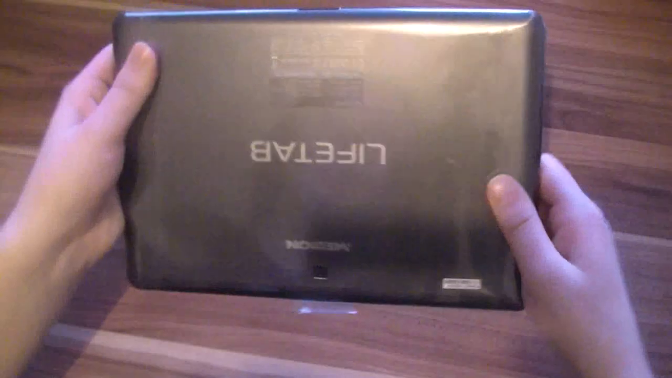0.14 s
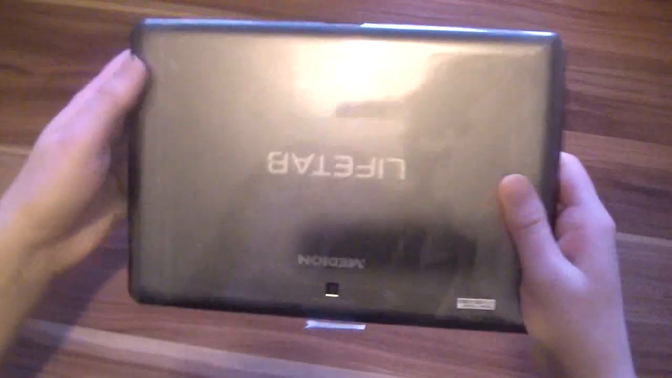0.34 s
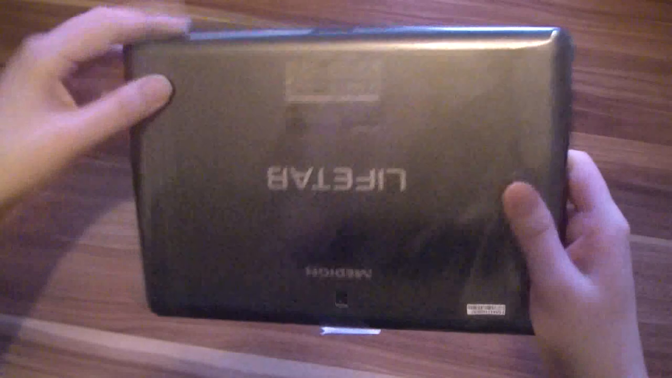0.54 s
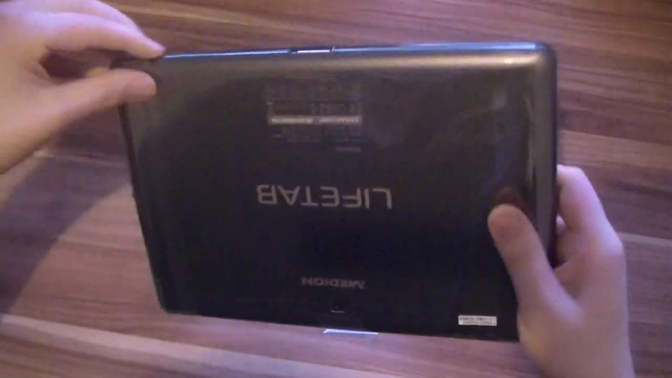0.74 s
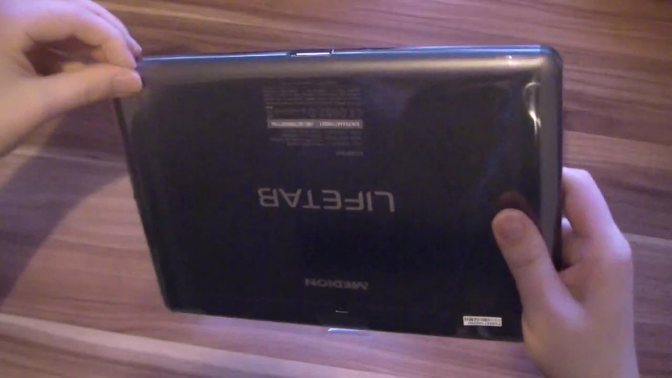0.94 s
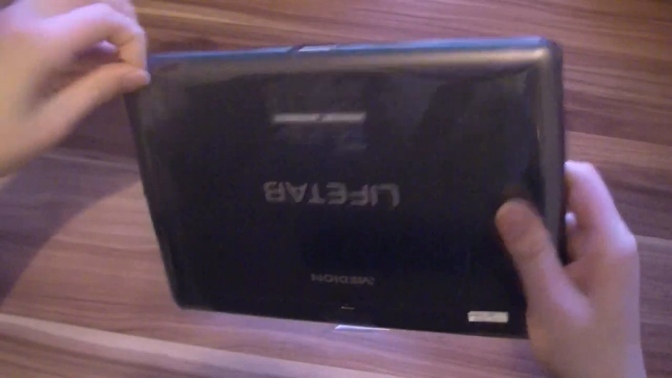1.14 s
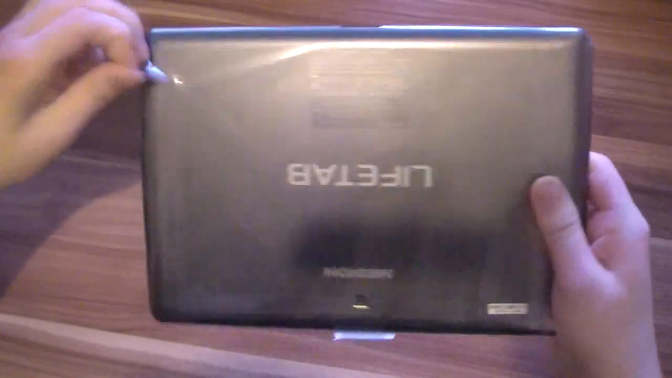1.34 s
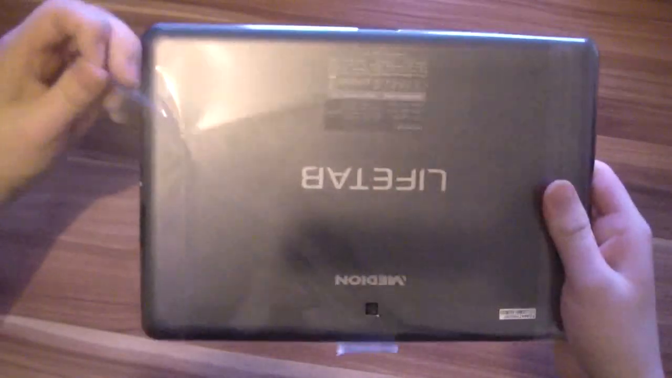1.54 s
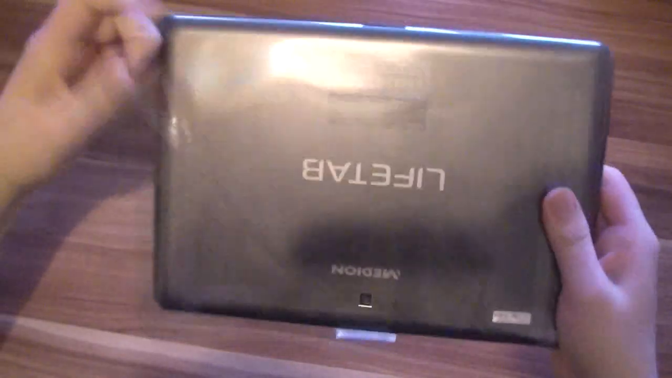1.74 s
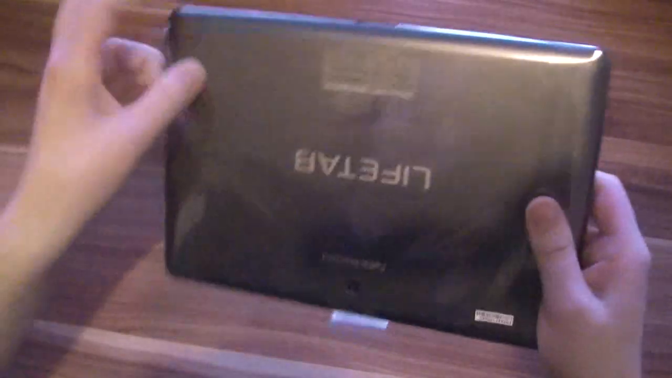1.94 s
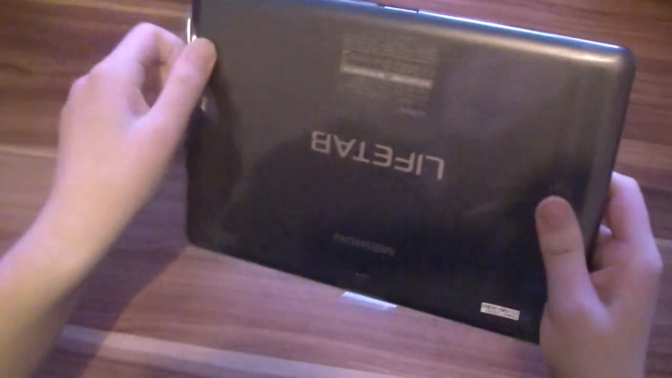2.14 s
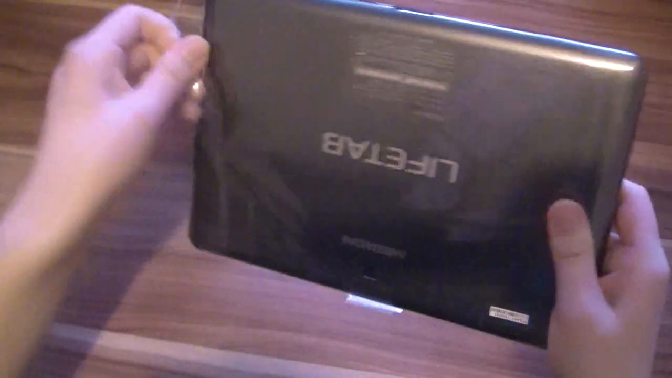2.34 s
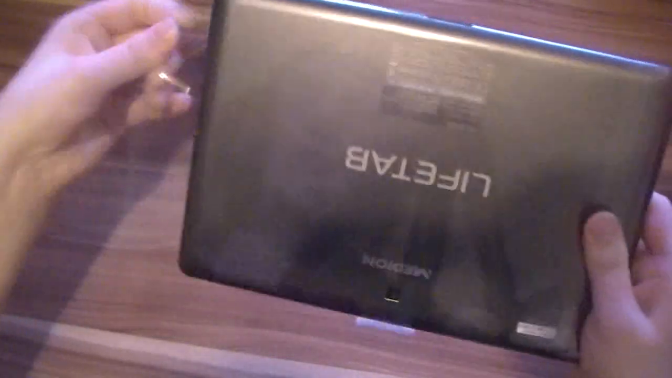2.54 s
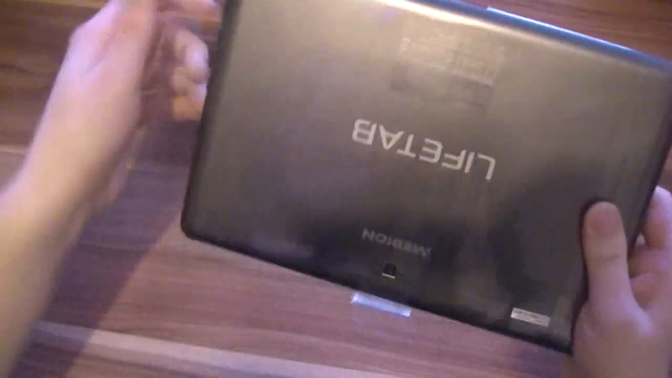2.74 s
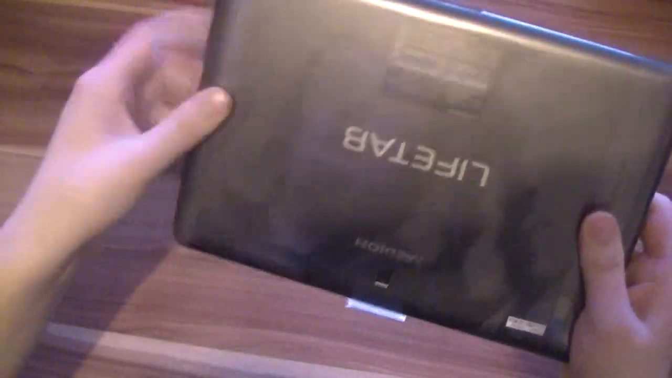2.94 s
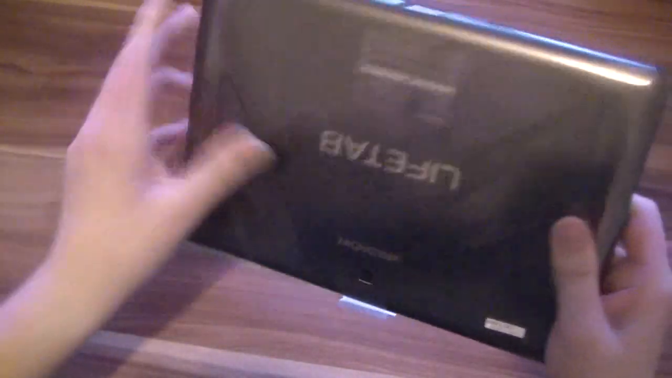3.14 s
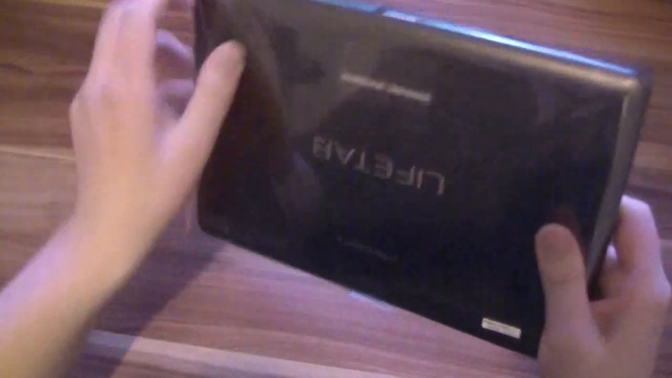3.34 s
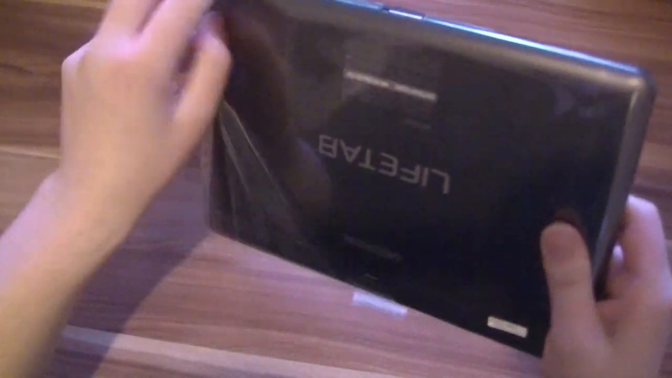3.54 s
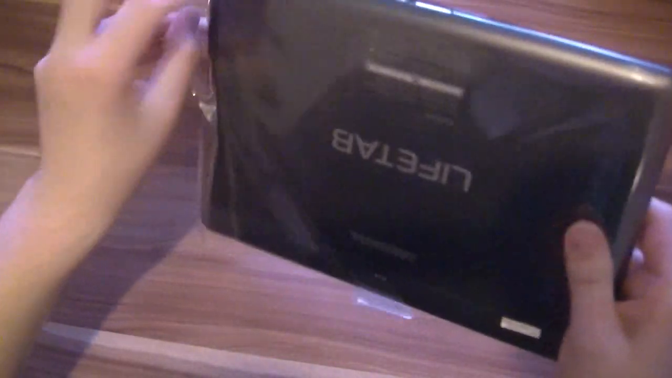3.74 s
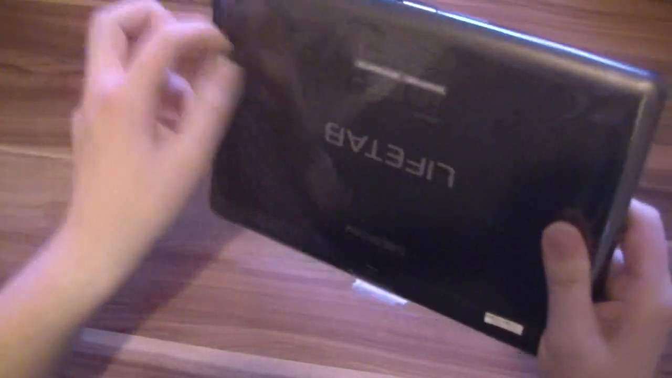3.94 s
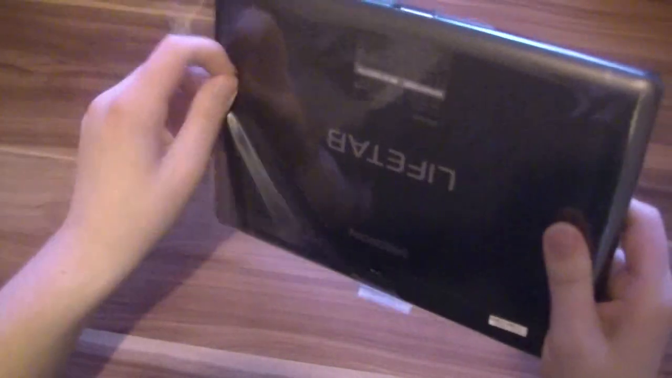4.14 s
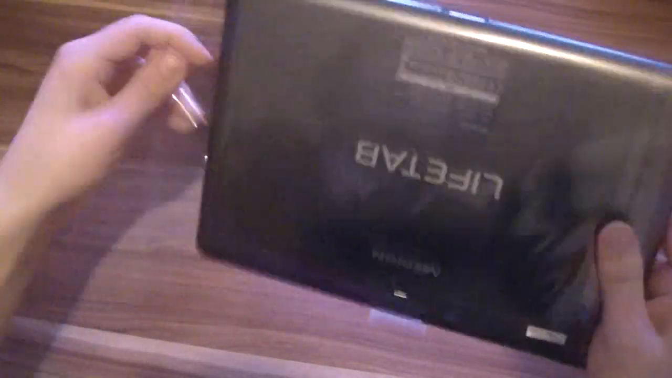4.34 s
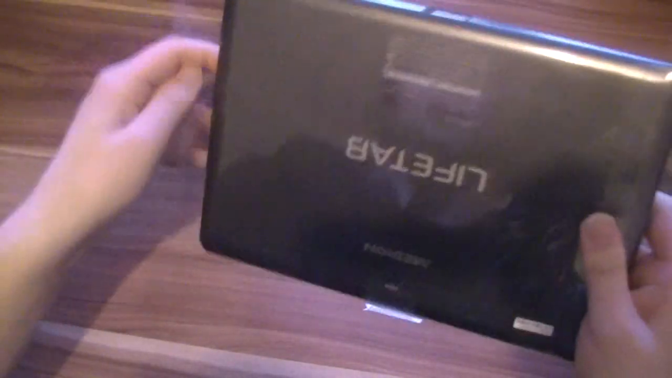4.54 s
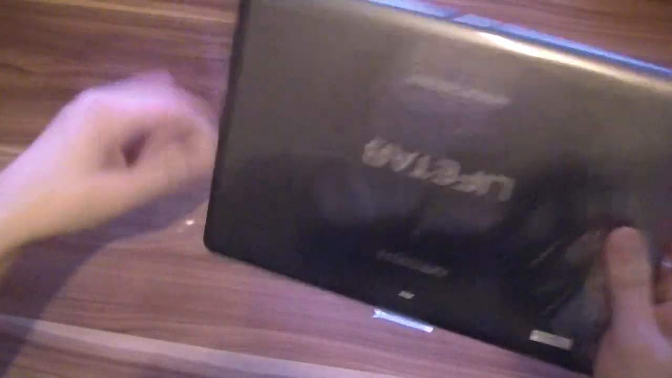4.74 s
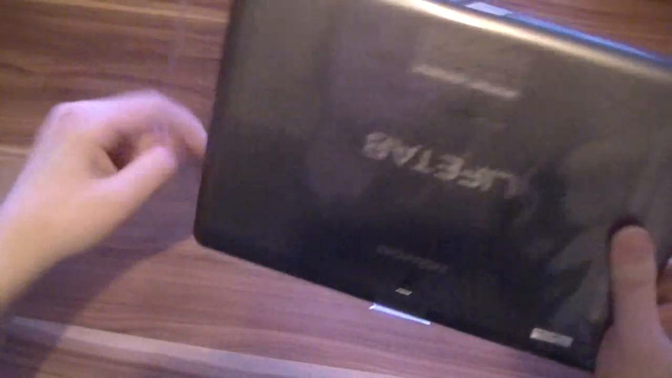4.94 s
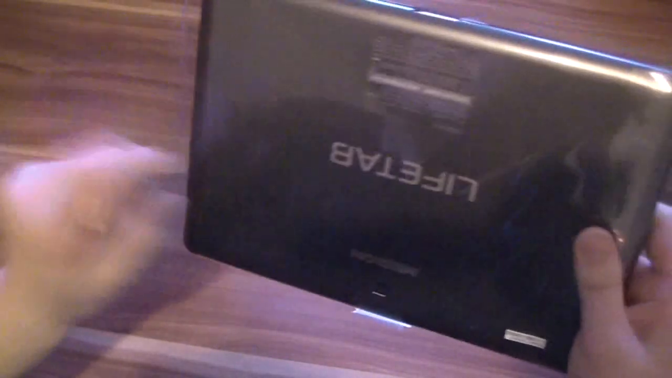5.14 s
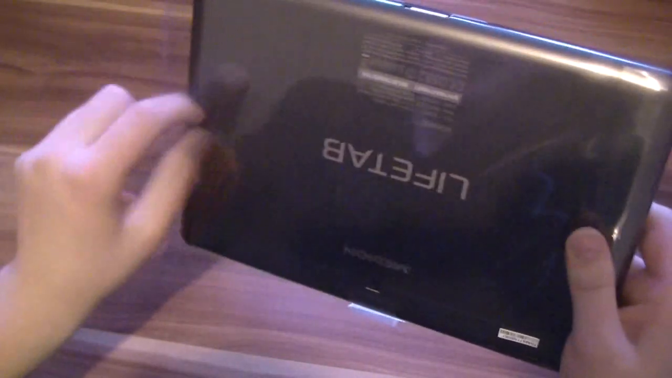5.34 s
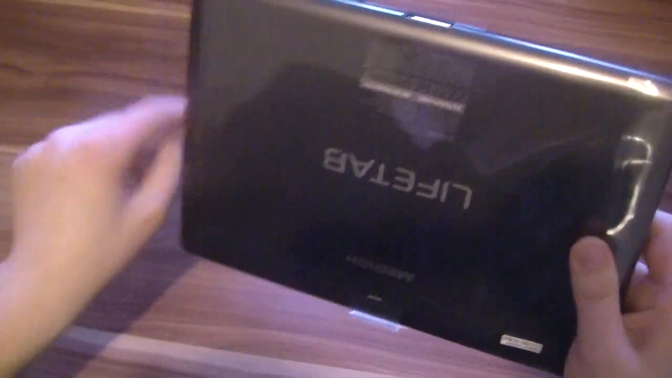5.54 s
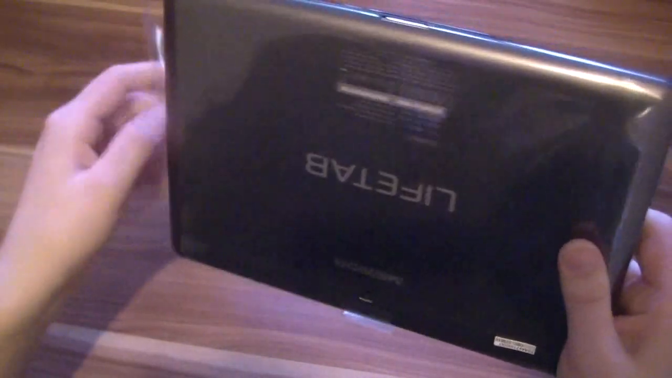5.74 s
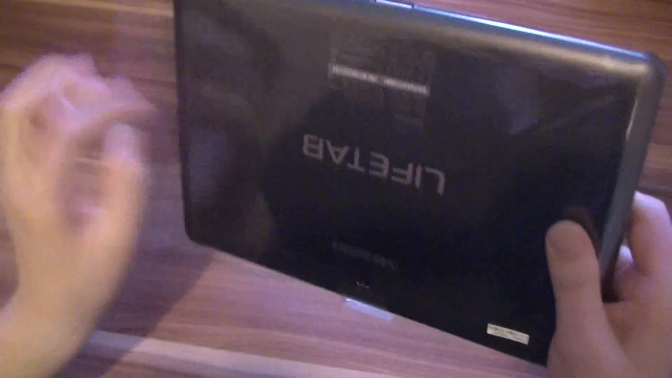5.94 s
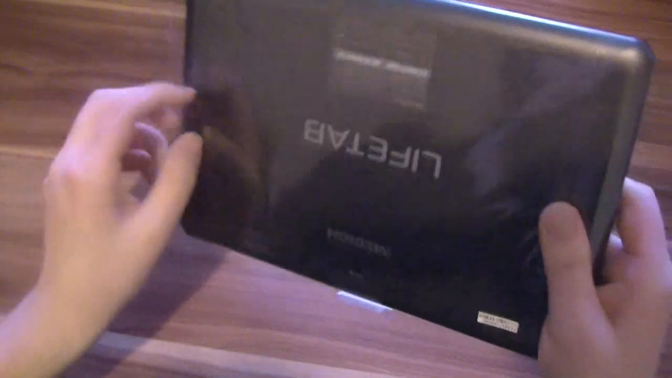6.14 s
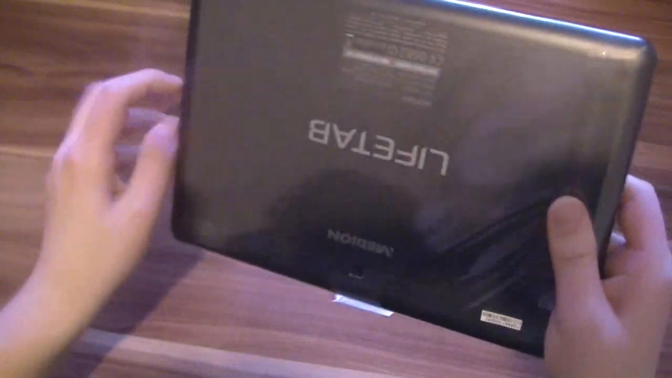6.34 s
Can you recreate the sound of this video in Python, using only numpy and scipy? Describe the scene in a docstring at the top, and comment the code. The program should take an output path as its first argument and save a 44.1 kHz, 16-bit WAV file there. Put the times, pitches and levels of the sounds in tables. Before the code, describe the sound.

Close stereo microphone in a small quiet room. Skin rubs faintly on a plastic shell, then soft ticks of thin film being picked. From about a second and a half the creases snap brighter, bursting into very loud sharp cracks near 2.5 and 4.25 seconds, with light hollow knocks and a short echo. Uneven medium crackles continue to the end.

```python
"""Peeling a protective film

Fingers pick a thin film off the plastic back of a hand-held tablet, close to a stereo microphone.
Creases buckle with bright snaps of filtered noise and knock the hollow shell, a set of decaying modes.
Random grains make the film's ticks, the fine hiss of glue letting go and the rub of skin on the shell.
One strong echo and a short room tail follow every snap, over a quiet hum of room air."""
import sys
import numpy as np
from scipy import signal
from scipy.fft import rfft, irfft
from scipy.io import wavfile

SR = 44100
rng = np.random.default_rng(int(sys.argv[2]) if len(sys.argv) > 2 else 0)


def to_linear_factor(level_db):
    """Convert decibel levels (scalar or array-like) to linear amplitude factors."""
    exponent = np.asarray(level_db, float) / 20
    return 10 ** exponent


def persist_wave(psi):
    """Save psi, clipped to +-1, as 16-bit WAV."""
    counts = np.round(np.clip(psi, -1, 1) * 32767).astype(np.int16)
    wavfile.write(sys.argv[1], SR, np.atleast_2d(counts).T)


N = 281910

# Single buckling creases. Each row: start in seconds, snap level in dB, middle pitch of the snap in Hz,
# level in dB of the knock on the shell's upper modes, level in dB of the thud on its lower modes.
SINGLE_SNAPS = [(0.3251, -34.5, 7300, -51, -69), (0.432, -61, 5000, -54.5, -49.5),
                (0.4964, -56, 3420, -50, -66), (0.589, -42, 7350, -53, -53), (0.6, -33, 11200, -63, -47),
                (0.7456, -43, 5700, -44.5, -55), (1.2554, -44, 8600, -60, -46.5),
                (1.289, -39.5, 9000, -66, -71), (1.3846, -16.5, 7300, -38, -72),
                (1.402, -30.5, 6900, -41, -68), (1.408, -18.5, 7000, -40, -69),
                (1.554, -32.5, 6570, -54, -67), (1.6852, -37, 5600, -40, -66),
                (1.708, -24.5, 9100, -65, -43), (1.7246, -26.5, 5900, -31, -38),
                (1.8996, -42, 6800, -38, -36.5), (1.9144, -20, 8200, -30, -37),
                (1.929, -27, 3660, -27, -33.5), (1.9387, -14, 8000, -22.5, -33),
                (1.9949, -43, 6500, -40, -38.5), (2.023, -47, 4200, -35.5, -41),
                (2.069, -19.5, 8040, -34, -44), (2.0932, -54, 6040, -35, -36.5),
                (2.187, -30, 5700, -38, -63), (2.3426, -20, 4500, -32.5, -63),
                (2.454, -5.5, 6530, -14.5, -32), (2.486, 2, 7800, -14, -23.5), (2.495, 0, 6160, -16, -30.5),
                (2.545, -10, 8300, -34, -35), (2.648, -17.5, 6430, -40, -38),
                (2.6651, -21.5, 7200, -51, -34), (2.6911, -16.5, 5250, -22.5, -25.5),
                (2.7457, -29, 6300, -26.5, -50), (2.7593, -0.5, 7300, -21, -38),
                (2.9478, -38, 4260, -37, -31), (2.9856, -22.5, 5440, -30.5, -40),
                (3.018, -14, 5140, -37, -45), (3.243, -20, 4400, -38, -43), (3.32, -26.5, 5800, -36.5, -44),
                (3.49, -24, 6800, -32.5, -38.5), (3.51, -32, 5400, -35.5, -41),
                (3.5384, -30, 10500, -54, -54), (3.5707, -7.5, 8200, -18.5, -26.5),
                (3.596, -17, 4870, -22.5, -27.5), (3.6595, -18, 6470, -23, -42),
                (3.744, -6.5, 7600, -22.5, -39), (3.912, -8.5, 7300, -22, -31.5),
                (3.9524, -12, 9100, -25, -28), (3.9774, -14, 9000, -28, -38),
                (4.046, -30, 4460, -39.5, -39), (4.1218, -24.5, 5240, -29.5, -38.5),
                (4.1867, -14.5, 6000, -21.5, -29.5), (4.233, -22, 5300, -31, -59),
                (4.2547, 1, 5750, -13.5, -51), (4.2782, 0, 8600, -14, -37),
                (4.296, -20, 7100, -10.5, -20.5), (4.3107, -19.5, 5000, -18, -34),
                (4.3458, -14, 5600, -39, -30), (4.415, -27, 5640, -25.5, -31.5),
                (4.5032, -49, 3200, -40, -32.5), (4.513, -12, 5000, -19, -34), (4.568, -31, 3940, -33, -38),
                (4.5949, -18, 4800, -34.5, -38.5), (4.6017, -12.5, 7200, -53, -34.5),
                (4.6163, -18.5, 6800, -24.5, -30), (4.6359, -14.5, 5130, -35, -31),
                (4.7225, -25, 7000, -35, -30.5), (4.7483, -13.5, 7500, -20.5, -26.5),
                (4.7917, -27, 6230, -30, -26), (4.9902, -24.5, 6900, -33.5, -34),
                (5.0617, -22.5, 7400, -28, -32.5), (5.2407, -32, 5500, -37, -46),
                (5.3148, -31, 5000, -33.5, -39), (5.5085, -27, 7300, -34.5, -30.5),
                (5.534, -33, 3630, -29, -29), (5.589, -18.5, 7400, -22.5, -27.5),
                (5.609, -23.5, 8700, -53, -30), (5.6974, -13.5, 6060, -30, -37.5),
                (5.7954, -18.5, 5030, -30, -63), (5.8695, -13, 8900, -22, -31.5),
                (5.9345, -26.5, 7000, -38, -36), (5.9838, -16, 7200, -29.5, -31.5),
                (6.0867, -27.5, 4430, -27.5, -30), (6.1087, -29, 6700, -46, -54),
                (6.2184, -26.5, 4450, -38.5, -59), (6.292, -28.5, 5000, -37, -55),
                (6.3092, -34, 3800, -41, -41), (6.3374, -25, 5200, -24, -32.5),
                (6.364, -34, 4500, -38, -25)]


def snaps():
    """Buckling: a crease gives way in a crack, flutters as it settles, and strikes the shell.
    Returns the sound towards the microphone and the smoother mean over all directions, for the room."""
    # Shell modes. Each row: nominal frequency in Hz, relative level in dB, t60 in seconds.
    low_modes = [(308, -3, 0.016), (484, 5, 0.012), (515, 4.5, 0.011), (730, 4, 0.019), (975, 2.5, 0.027),
                 (1170, -2, 0.018)]
    high_modes = [(1500, -3.5, 0.028), (1960, 6.5, 0.0096), (2430, -1, 0.022), (2725, -0.5, 0.014),
                  (3530, 4.2, 0.011)]
    s, snap_db, pitch_hz, knock_db, thud_db = np.transpose(every_snap())
    count = len(s)
    t = np.arange(1200) / SR
    click = 1.0 * (t == 0)

    shape = np.exp(-t / 0.00025) + to_linear_factor(-15) * np.exp(-t / 0.0022)
    # after 0.6 ms the flutter is made of small re-snaps
    flutter_db = 4 * np.minimum(rng.exponential(1, (count, len(t))), 3) - 4
    cracks = rng.standard_normal((count, len(t))) * shape * to_linear_factor(flutter_db * (t > 0.0006))
    spread = np.zeros_like(cracks)
    for k, hz in enumerate(pitch_hz):
        # the buckling patch sets the colour; a small crease radiates no bass
        both = [cracks[k], click]
        patch = band(both, hz / 1.58, hz * 1.496, order=2)
        cracks[k], spread[k] = patch + 0.041 * band(both, 4700, 10700)

    towards = to_linear_factor(snap_db)[:, None] * peak_one(cracks)
    knocks = shell(high_modes, t, count, spread_db=5.0, contact_s=0.0001)
    towards += to_linear_factor(knock_db)[:, None] * knocks
    thuds = shell(low_modes, t, count, spread_db=4.0, contact_s=0.00048)
    towards += to_linear_factor(thud_db)[:, None] * thuds

    around = to_linear_factor(snap_db + 5)[:, None] * peak_one(spread)
    around += to_linear_factor(knock_db + 8)[:, None] * peak_one(band([click], 1340, 3860, order=2))
    around += to_linear_factor(thud_db + 8.5)[:, None] * peak_one(band([click], 335, 1430, order=2))

    # a faint noise swells for a few milliseconds before each snap
    lead = 200  # samples
    swell = np.exp(np.arange(-lead, 0) / (0.0015 * SR))
    noise = band(rng.standard_normal((count, lead)), 1500, 12000) * swell
    lead_in = lay_out(s - lead / SR, to_linear_factor(snap_db - 15)[:, None] * peak_one(noise))

    # each crease sits a little to one side
    lean_db = 0.4 * rng.standard_normal((count, 1))
    left = lay_out(s, towards * to_linear_factor(lean_db))
    right = lay_out(s, towards * to_linear_factor(-lean_db))
    return np.array([left, right]) + lead_in, lay_out(s, around)


def every_snap():
    """Cascaded buckling: single snaps, then the uneven run of snaps as each fold rips open."""
    # Each row: start in seconds, length in seconds, typical snap level in dB, middle pitch in Hz.
    rips = [(1.887, .012, -40, 5600), (3.927, .02, -35, 5950), (2.497, .03, -49.5, 6800),
            (4.163, .02, -33, 5000), (4.241, .01, -24.5, 6200), (4.265, .038, -16, 5740),
            (4.748, .022, -23.5, 5400), (4.831, .026, -27.5, 5000), (4.975, .012, -30.5, 6500),
            (5.045, .022, -29.5, 6600), (5.576, .012, -30, 4400), (5.852, .018, -29.5, 6200),
            (5.493, .016, -35.5, 5800), (6.335, .016, -31.5, 4860)]
    gap_s = 0.004
    rows = [np.array(SINGLE_SNAPS)]
    for start, length, db, hz in rips:
        count = max(2, round(length / gap_s))
        luck = rng.standard_normal((12, 5))[:count]
        s = start + gap_s * (np.arange(len(luck)) + 0.3 * np.clip(luck[:, 0], -1, 1) + 0.3)
        pitch_hz = hz * 2 ** (0.3 * luck[:, 1])  # spread in octaves
        snap_db, knock_db, thud_db = np.transpose(db + 3.0 * luck[:, 2:])
        rows.append(np.transpose([s, snap_db, pitch_hz, knock_db - 8.5, thud_db - 15.5]))
    return np.vstack(rows)


def shell(modes, t, count, spread_db, contact_s):
    """Modal ringing: each blow lands elsewhere, so every mode varies in strength, sign and tuning."""
    hz, db, t60 = np.transpose(modes)
    luck = rng.standard_normal((count, 3, len(hz), 1))
    strength = to_linear_factor(db[:, None] + spread_db * luck[:, 0]) * np.sign(luck[:, 1])
    tuned_hz = hz[:, None] * (1 + 0.05 * luck[:, 2])
    rings = np.sin(2 * np.pi * tuned_hz * t) * to_linear_factor(-60 * t / t60[:, None])
    contact = 1 - np.exp(-t / contact_s)
    return peak_one((strength * rings).sum(axis=1) * contact)


def crinkle():
    """Crackling noise: small creases tick in clumps, each tick an octave or so wide at its own pitch."""
    # Fingers working the loose film. Each row: time in seconds, relative level in dB,
    # middle pitch of the ticks in Hz.
    handling = [(0, -74, 3170), (.6, -73, 4000), (1.0, -85, 5000), (1.4, -64, 1500), (1.82, -70, 2010),
                (2.15, -51.5, 2500), (2.3, -63.5, 3070), (2.65, -41.5, 2500), (3.0, -77, 2000),
                (3.3, -55.5, 3000), (3.46, -79.5, 3000), (3.9, -69, 2500), (4.5, -68, 1500),
                (4.85, -44, 1500), (5.2, -86, 2500), (5.3, -52.5, 2500), (5.47, -65.5, 1990),
                (5.8, -45, 2500), (6.15, -61.5, 1810), (6.39, -52.5, 1200)]
    level_db, pitch_hz = in_time(handling)

    # after a knock the shaken film keeps crinkling for a moment; this is added as power
    s, knock_db = np.transpose(SINGLE_SNAPS)[[0, 3]]
    t = np.arange(SR // 2) / SR
    swell = (1 - np.exp(-t / 0.0062)) * np.exp(-t / 0.034)
    shaken = lay_out(s, to_linear_factor(2 * (knock_db - 25))[:, None] * swell)

    clumps = to_linear_factor(3.8 * drift(35))
    out = 0
    for hz in np.geomspace(400, 12000, 10):
        releases = grains(per_s=170.0 * clumps, size_db=3.5) + 1e-18
        tick = rms_one(band(releases, hz / 1.53, hz * 1.86, order=2))
        out = out + closeness(hz, pitch_hz, octaves=1.72) * tick
    return out * np.sqrt(to_linear_factor(2 * level_db) + shaken) / 2


def peel():
    """Adhesive fracture: glue threads break by the thousand as each pull settles to its own pitch."""
    # Each row: start in seconds, length in seconds, relative hiss level in dB,
    # first pitch in Hz, settled pitch in Hz.
    pulls = [(.03, 0.24, -65, 7100, 7300), (1.26, 0.392, -58, 8340, 6300), (2.26, 0.077, -54, 9000, 5600)]
    width_octaves, settle_s = 0.18, 0.098
    upper_ratio, upper_share = 1.47, 0.54  # a second, weaker band above the first
    gain = np.zeros(N)
    pitch_hz = np.full(N, pulls[0][3], float)
    for start, length, db, first_hz, settled_hz in pulls:
        t, shape = stroke(start, length, attack=0.02, release=0.03)
        gain = gain + to_linear_factor(db) * shape
        glide_hz = settled_hz + (first_hz - settled_hz) * np.exp(-t / settle_s)
        pitch_hz = np.where(t > 0, glide_hz, pitch_hz)
    out = 0
    for hz in np.geomspace(4800, 15500, 13):
        threads = band(grains(per_s=4000.0, size_db=2.5), hz / 1.09, hz * 1.09, order=2)
        main = closeness(hz, pitch_hz, width_octaves)
        upper = closeness(hz, upper_ratio * pitch_hz, width_octaves)
        out = out + (main + upper_share * upper + 0.25) * rms_one(threads)
    return out * gain * to_linear_factor(2.5 * drift(25)) / 2


def slide():
    """Stick-slip friction: skin slips in dense grains and excites the hollow of the shell."""
    # Each row: frequency in Hz, relative spectrum level in dB.
    rub_spectrum = [(200, -25), (400, 0), (560, 5), (720, 1), (950, 8.5), (1300, -7), (2200, -14.5),
                    (3200, -10.5), (4500, -14), (9000, -32)]
    t, shape = stroke(start=0.016, length=0.26, attack=0.052, release=0.035)
    rub = coloured(grains(per_s=3200.0, size_db=1.0), rub_spectrum)
    fading_db = -48 - 36 * t  # fades by 36 dB per second
    return rub * shape * to_linear_factor(fading_db + 2.0 * drift(21))


def hand():
    """Superposition of everything between the loud snaps."""
    return peel() + slide() + crinkle()


def room(x):
    """Diffuse reverberation: a noise tail fills in, then decays exponentially band by band."""
    # Each row: frequency in Hz, t60 in seconds, relative level in dB, left-right likeness.
    decay = [(149, 0.35, -27, 0.28), (397, 0.43, -37.5, 0.97), (990, 0.37, -39, 0.53),
             (2500, 0.36, -35, 0.51), (5000, 0.42, -34, 0.25), (9000, 0.32, -34.5, 0.071),
             (12050, 0.31, -34.5, .2), (15500, 0.22, -30, 0.19)]
    fill_s = 0.0013
    t = np.arange(SR // 2) / SR
    edges = 100 * 2 ** np.arange(0, 7.6, 0.5)  # half octaves, in Hz
    tail = 0
    for low, high in zip(edges, edges[1:]):
        mid, side = band(rng.standard_normal((2, len(t))), low, high, order=2)
        hz = np.sqrt(low * high)
        level_db = at_hz(decay, hz, order=2) - 60 * t / at_hz(decay, hz)
        tail = tail + pair(mid, side, at_hz(decay, hz, order=3)) * to_linear_factor(level_db)
    tail = tail * np.minimum(t / fill_s, 1)
    return signal.fftconvolve(x[None], tail)[:, :N]


def air():
    """Stationary noise: room air and microphone hiss, mostly unlike in the two channels."""
    # Each row: frequency in Hz, relative spectrum level in dB.
    spectrum = [(18, -53), (30, -16.5), (154, -5), (409, -11.5), (858, -11.5), (1090, -14), (5440, -29),
                (14800, -32), (15900, -67)]
    # Each row: frequency in Hz, left-right likeness.
    likeness = [(60, 0.25), (130, 0.51), (300, 0.032), (1500, 0.12), (6000, .15), (15000, .1)]
    mid, side = rfft(coloured(rng.standard_normal((2, N)), spectrum))
    hz = np.arange(len(mid)) * SR / N
    both = irfft(pair(mid, side, at_hz(likeness, hz)), N)
    return to_linear_factor(-63.5 + 0.16 * drift(8)) * np.sqrt(2) * both


def grains(per_s, size_db):
    """Poisson-like impulses: tiny releases at random moments, most small, a few large."""
    sizes = to_linear_factor(size_db * np.minimum(rng.exponential(1, N), 5)) * rng.choice([-1, 1], N)
    return sizes * (rng.random(N) < per_s / SR)


def stroke(start, length, attack, release):
    """Amplitude envelope: time since the start, and a gain that rises, holds and lets go."""
    t = np.arange(N) / SR - start
    ramps = np.minimum(t / attack, (length + release - t) / release)
    return np.maximum(t, 0), np.clip(ramps, 0, 1) ** 2


def drift(rate):
    """Low-passed noise: a slow random wander of rms 1, with its corner at rate in Hz."""
    r = np.exp(-2 * np.pi * rate / SR)
    noise = rng.standard_normal(N + SR)
    # the first second lets the filter settle
    return rms_one(signal.lfilter([1], [1, -2 * r, r * r], noise)[SR:])


def coloured(x, spectrum):
    """Spectral shaping: weight a long noise in frequency; rms 1."""
    n = x.shape[-1]
    gain = to_linear_factor(at_hz(spectrum, np.arange(n // 2 + 1) * SR / n))
    return rms_one(irfft(rfft(x) * gain, n))


def pair(mid, side, likeness):
    """Partial coherence: left and right as sum and difference of two unrelated signals."""
    alike = np.clip(likeness, 0, 1)
    return np.sqrt((1 + alike) / 2) * mid + np.sqrt((1 - alike) / 2) * side * np.array([[1], [-1]])


def band(x, low_hz, high_hz, order=1):
    """Causal Butterworth band-pass."""
    edges_hz = [low_hz, min(high_hz, 0.45 * SR)]
    return signal.sosfilt(signal.butter(order, edges_hz, "band", fs=SR, output="sos"), x)


def closeness(hz, pitch_hz, octaves):
    """Resonance weighting: a bell curve in log pitch."""
    return np.exp(-0.5 * (np.log2(hz / pitch_hz) / octaves) ** 2)


def at_hz(points, hz, order=1):
    """Interpolation of one table column along log frequency."""
    points = np.array(points)
    return np.interp(np.log(np.maximum(hz, 1)), np.log(points[:, 0]), points[:, order])


def in_time(rows):
    """Linear interpolation in time: one control signal for each column of a table."""
    s, *columns = np.transpose(rows)
    return [np.interp(np.arange(N) / SR, s, column) for column in columns]


def lay_out(s, blows):
    """Superposition in time: each short sound is added at its moment."""
    out = np.zeros(N + blows.shape[1])
    for at, blow in zip(np.round(s * SR).astype(int), blows):
        out[at:at + len(blow)] += blow
    return out[:N]


def rms_one(x):
    """Power normalisation: scale to an rms of 1."""
    return x / np.sqrt(np.mean(x ** 2) + 1e-20)


def peak_one(rows):
    """Peak normalisation: scale every row to a peak of 1."""
    return rows / np.abs(rows).max(axis=1, keepdims=True)


def scene():
    """Sound paths: film and shell heard directly, once more off a near hard surface, and by the room."""
    echo_s, echo_db = 0.0069, -13
    towards, around = snaps()
    work = hand()
    near = towards + work
    lag = round(echo_s * SR)
    # the echo returns with left and right swapped
    near[:, lag:] += to_linear_factor(echo_db) * near[::-1, :-lag]
    # small sources and a small microphone limit the band
    return band(near + room(around + work), 140, 13000, order=2) + air()


def band_limit(x):
    """A steep low-pass at the top of the band."""
    return signal.sosfilt(signal.butter(12, 16970, fs=SR, output="sos"), x)


def record(dry):
    """Transduction: two capsules differ a little in colour, and saturation rounds the highest peaks."""
    # Each row: frequency in Hz, left minus right in dB.
    balance = [(60, -2), (380, 1), (2380, 0.5), (15000, -1.5)]
    lean_db = at_hz(balance, np.arange(N // 2 + 1) * SR / N) / 2
    heard = irfft(rfft(dry) * to_linear_factor([lean_db, -lean_db]), N)
    mix = 0.92 * np.tanh(heard / 1.058)
    return band_limit(mix)


dry = scene()
out = record(dry)
persist_wave(out)
```